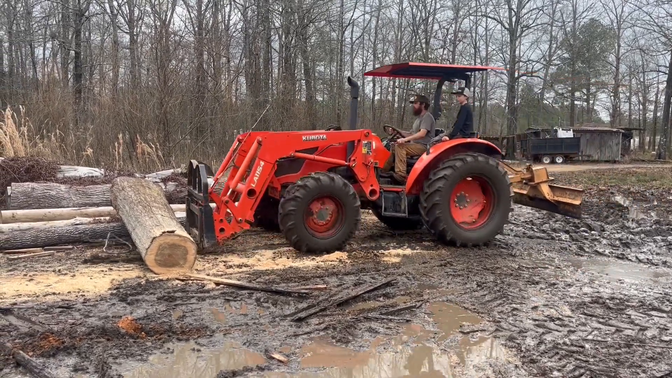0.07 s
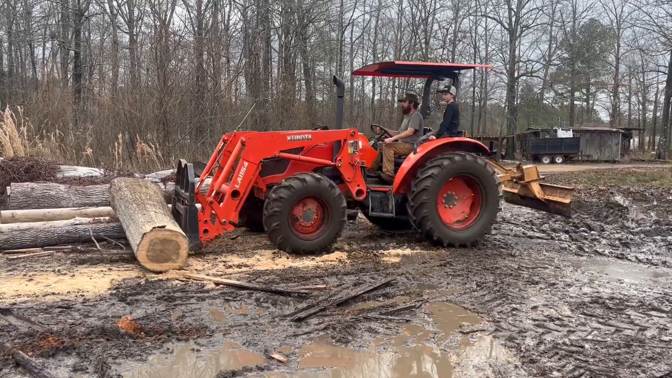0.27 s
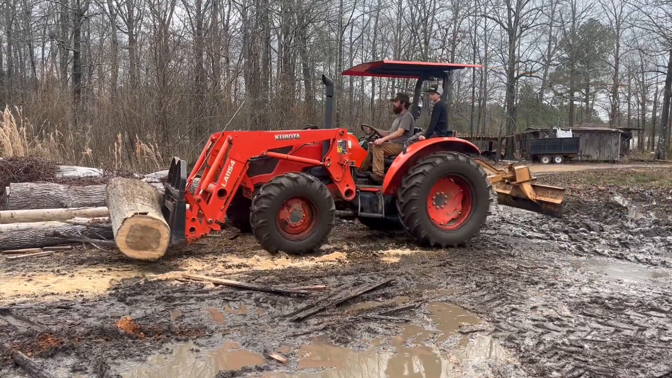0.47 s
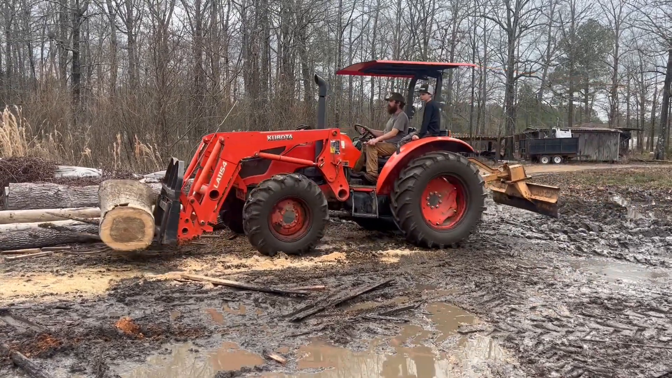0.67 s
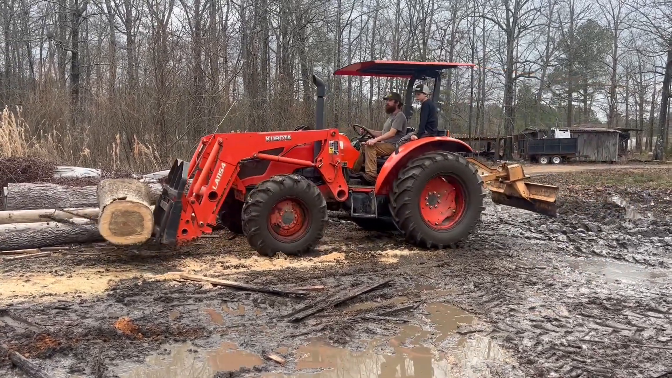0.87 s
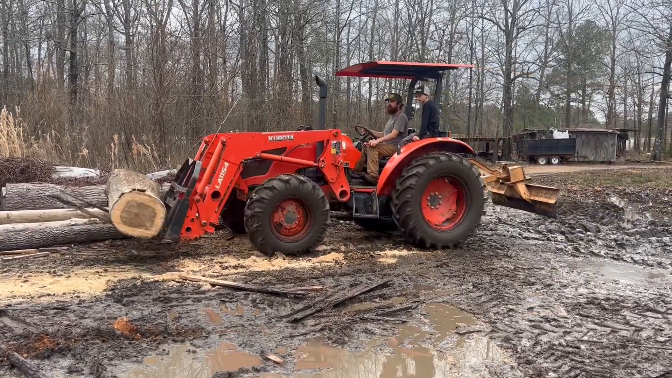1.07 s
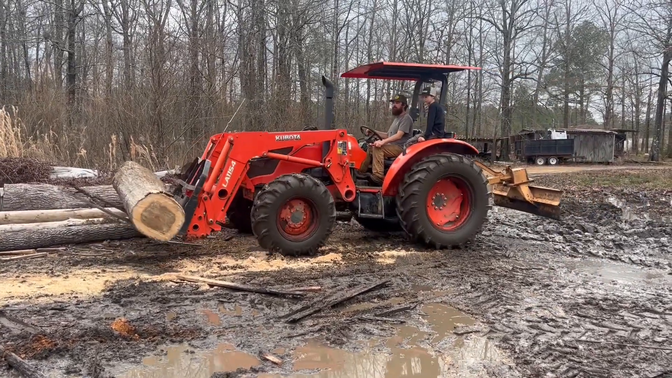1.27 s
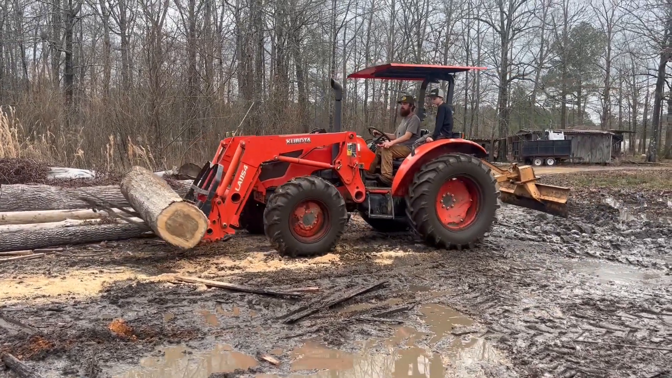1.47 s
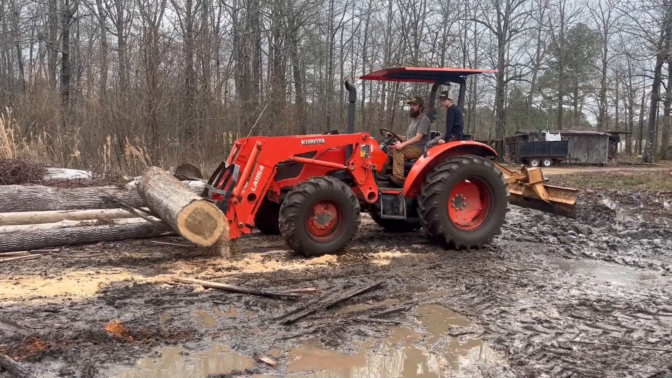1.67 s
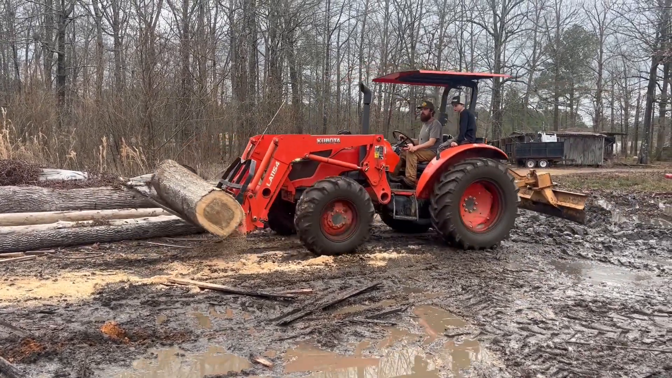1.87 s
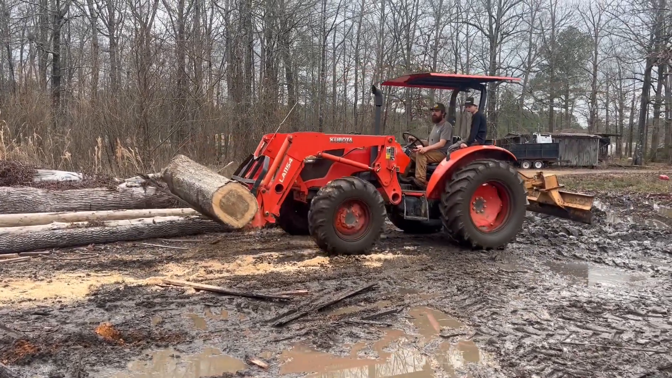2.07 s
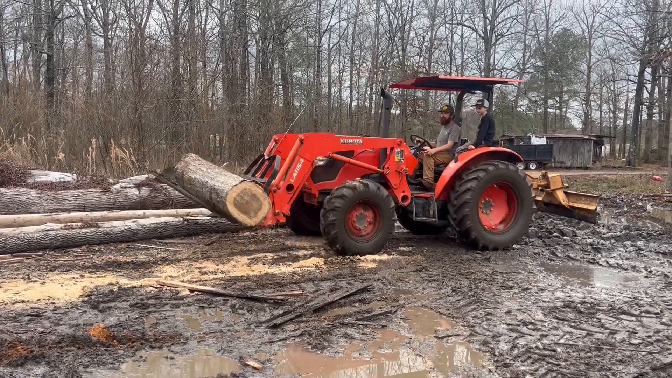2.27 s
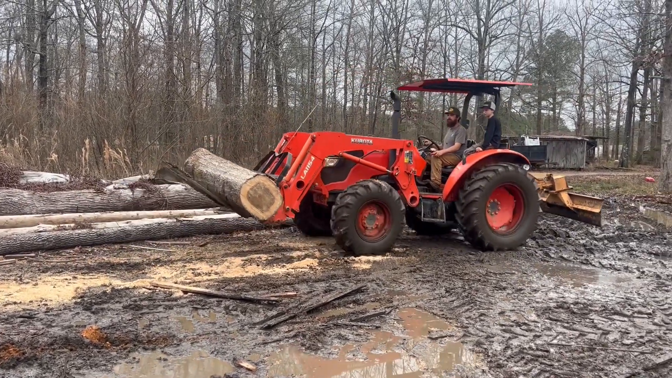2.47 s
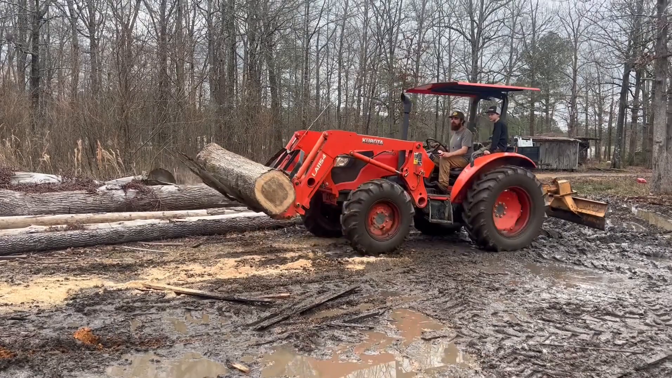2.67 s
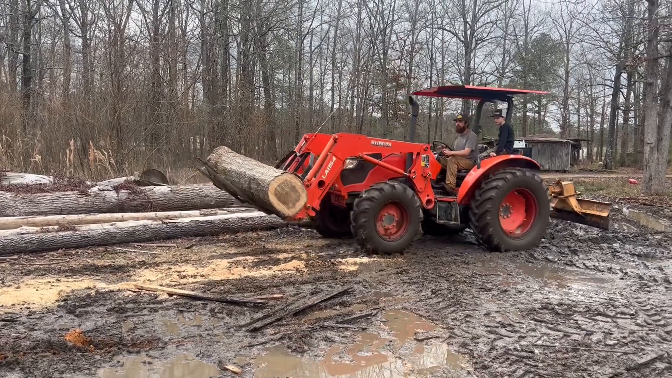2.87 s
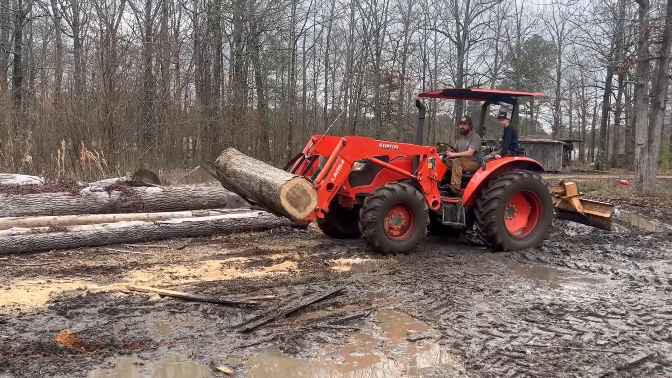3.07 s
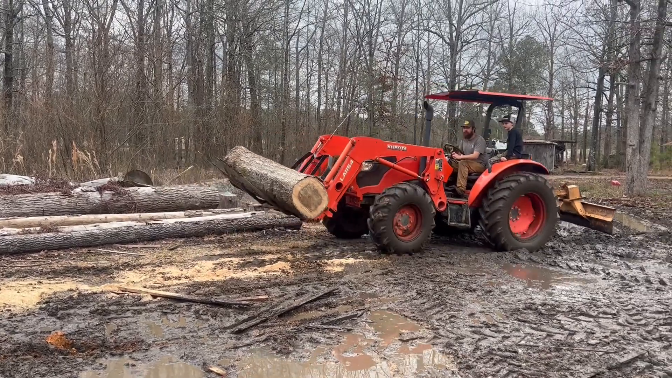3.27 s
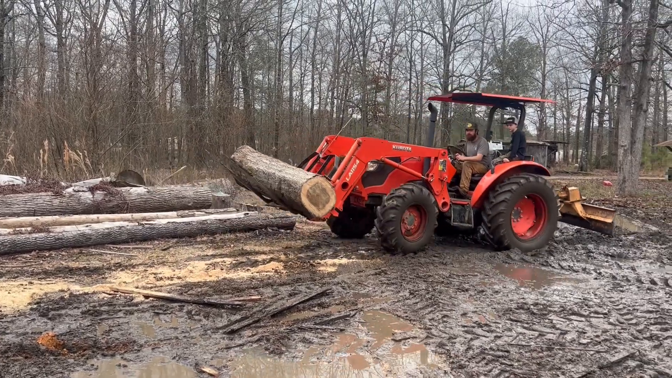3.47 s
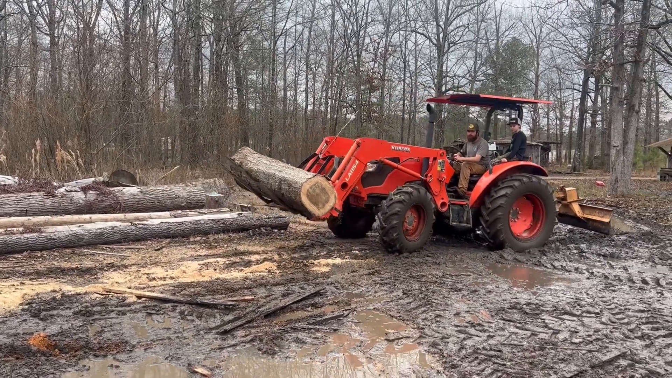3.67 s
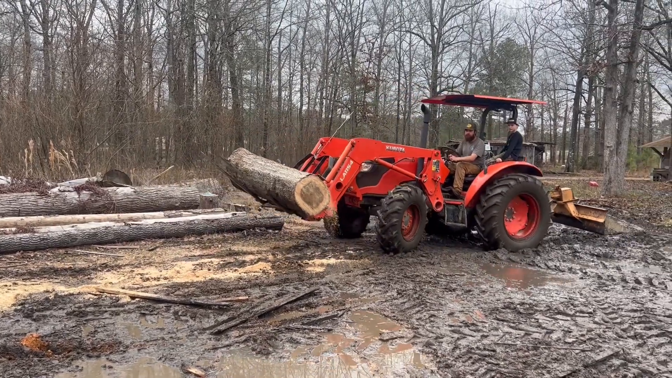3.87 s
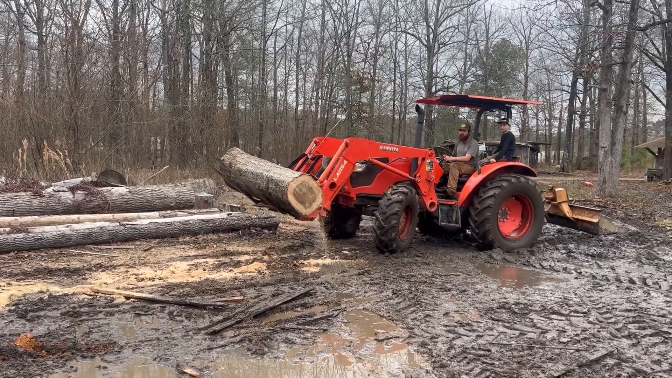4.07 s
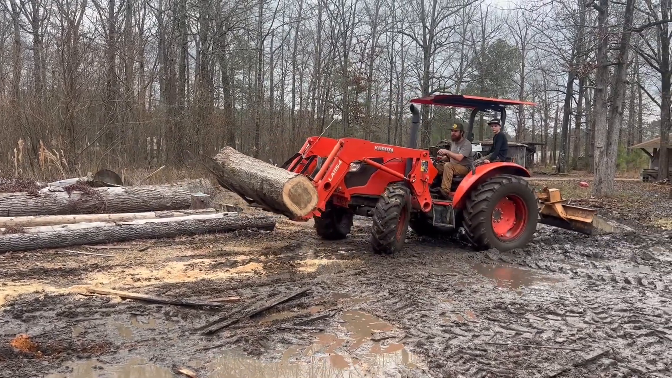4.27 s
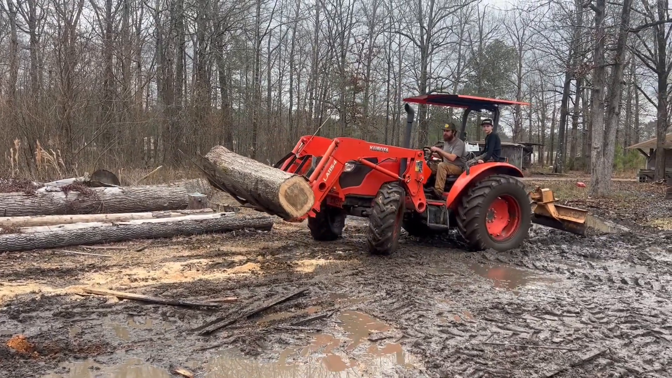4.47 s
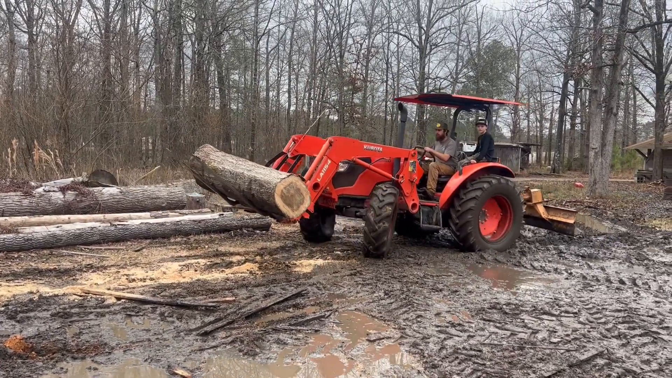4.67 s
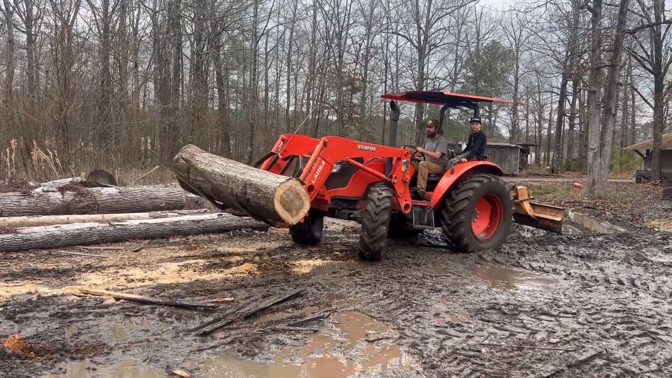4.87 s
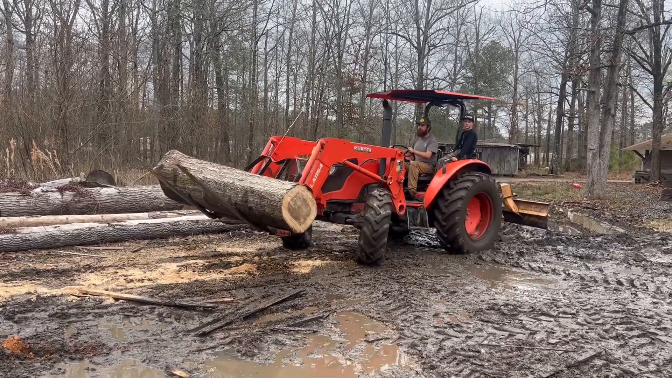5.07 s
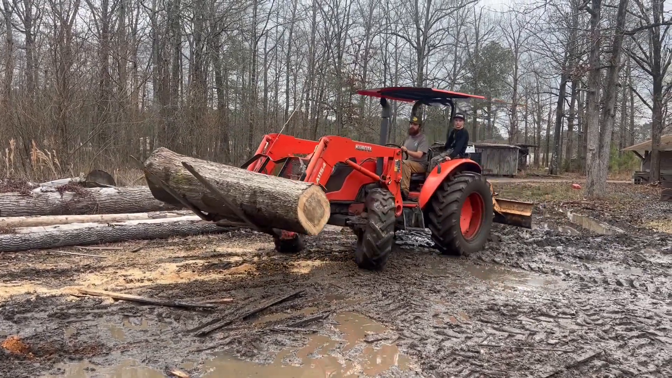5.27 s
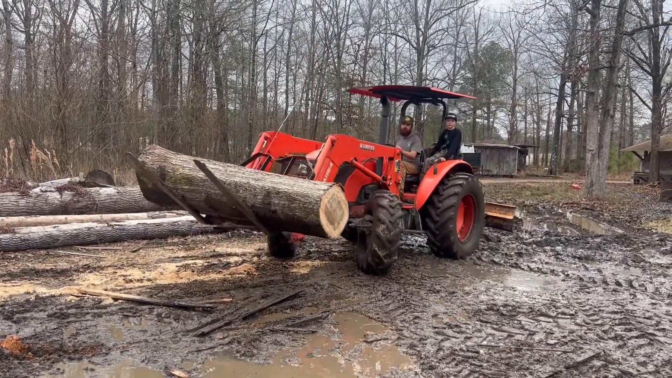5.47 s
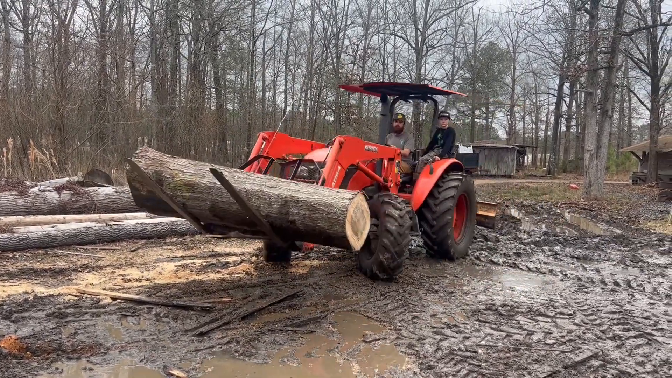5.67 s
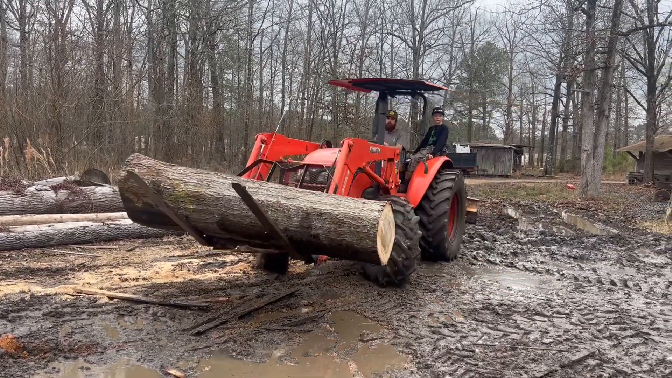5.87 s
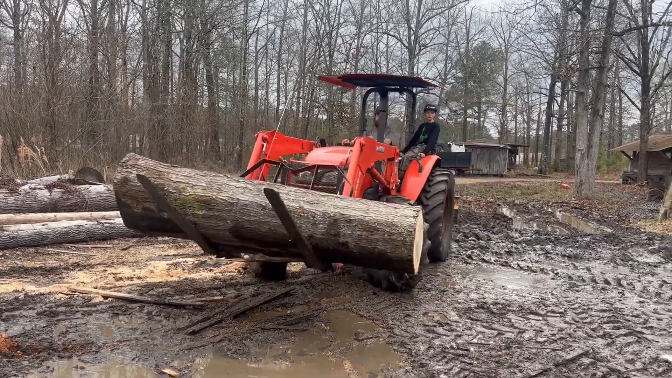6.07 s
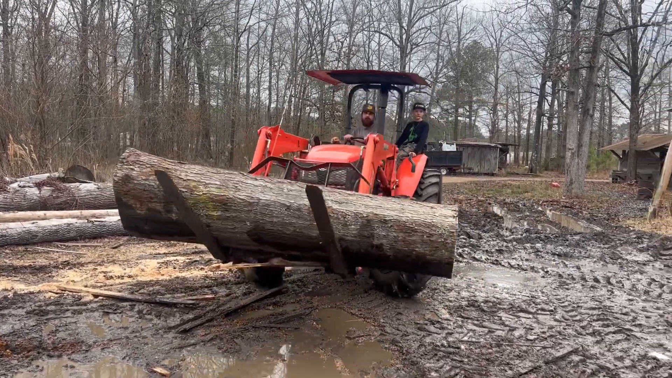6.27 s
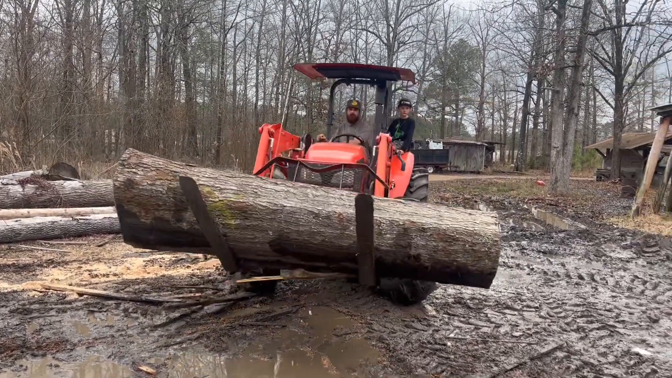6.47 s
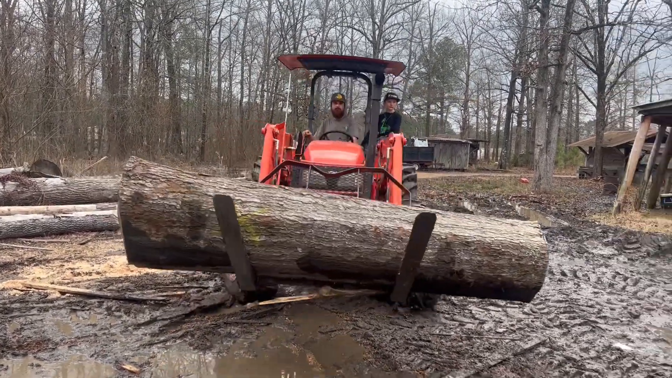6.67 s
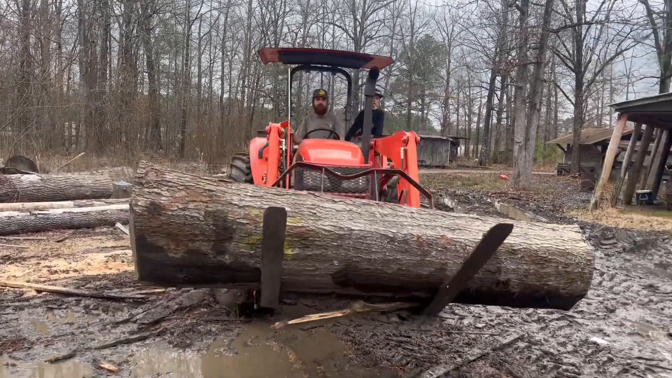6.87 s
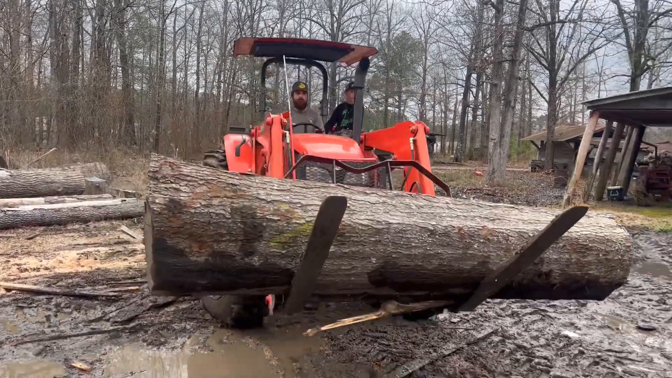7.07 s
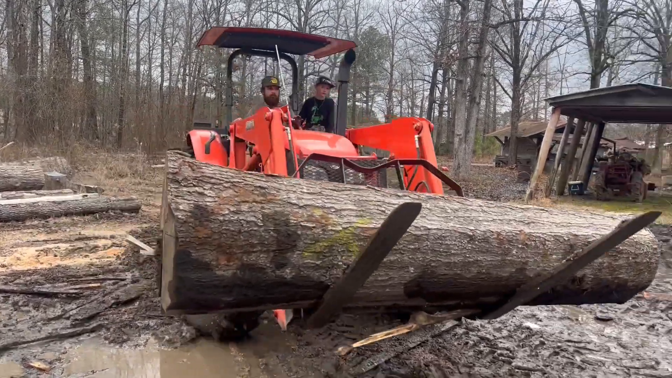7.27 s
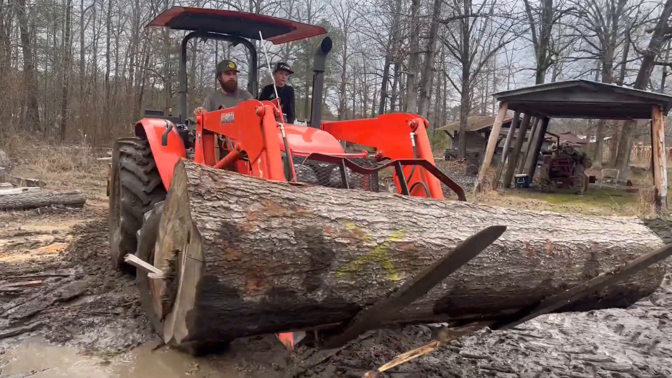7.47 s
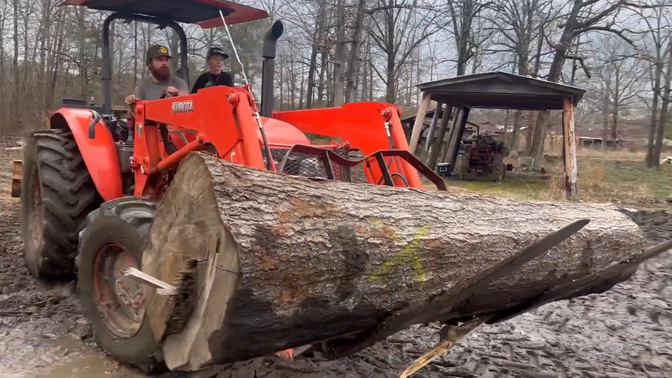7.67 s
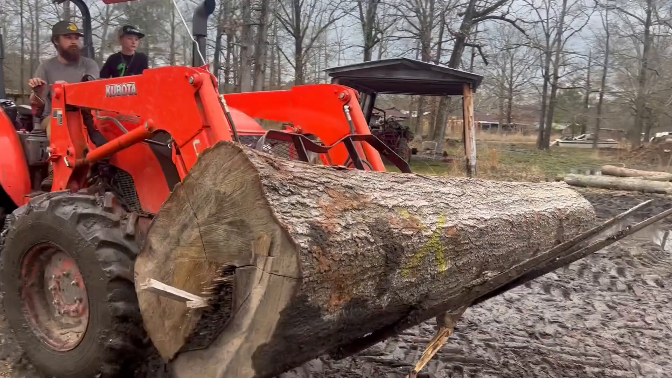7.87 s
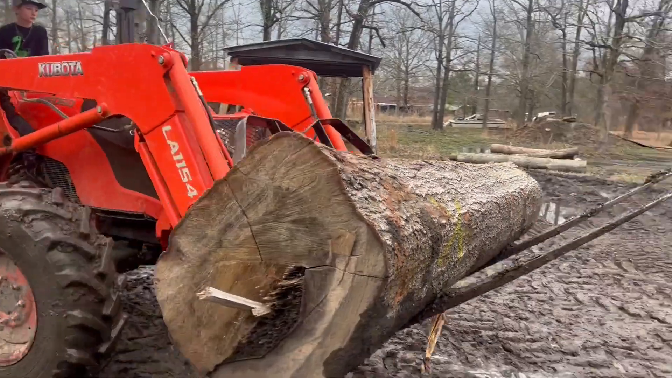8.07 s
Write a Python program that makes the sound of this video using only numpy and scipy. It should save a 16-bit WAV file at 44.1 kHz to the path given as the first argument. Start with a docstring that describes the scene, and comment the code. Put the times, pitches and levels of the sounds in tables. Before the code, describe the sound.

Open muddy yard, handheld stereo microphone. From 0 s a diesel tractor chugs low and moderately loud, with knocking clatter, hydraulic hum and soft tyre rumble. A firm clank of steel on wood lands at 0.4 s, with smaller rattles until about 0.65 s. The rumble sinks near 1 s, then a loose run of dull knocks and light rattles follows from 1.2 to 1.8 s, with faint ticks to 2.2 s. Engine pitch rises around 1.7-2 s, with brief thin hydraulic whines until 2.7 s, then holds steady. It surges near 4.2 s, dips, and short buzzy steering groans come at 4.6-4.9 s. From 5 s revs climb clearly, with wavering gear whines. From 6 s the drone is strong and high-revving; small clicks come at 6.5 and 6.9 s. From 7.4 s deep tyre thumps, heavy rumble, another groan at 7.8 s and sharp little rattles mark the close, loudest pass, still running at 8.1 s.

```python
"""A diesel tractor lifts a log on its loader forks, backs up, turns and drives close past in a muddy yard.
Its engine makes clean exhaust and pump tones from sines, and knock, drone and hiss from noise that pulses
with each firing. Tyres and driveline rumble below as filtered noise, and gears sing as gliding sines.
The log and forks clank, mostly early on, as tiny random contacts that ring the steel; the steering
hydraulics groan as an uneven buzz with a rush of oil."""
import sys
import numpy as np
from scipy import signal
from scipy.fft import rfft, irfft, next_fast_len
from scipy.io import wavfile
from scipy.ndimage import uniform_filter1d

SR = 44100
rng = np.random.default_rng(int(sys.argv[2]) if len(sys.argv) > 2 else 0)


def unload_audio(sound):
    """Save the sound as a 16-bit wav file, at the path given as the first command line argument."""
    columns = np.transpose(np.atleast_2d(sound))
    # keep every value between -1 and 1, then stretch to whole-number steps
    steps = np.round(np.clip(columns, -1, 1) * 32767)
    wavfile.write(sys.argv[1], SR, steps.astype(np.int16))


N = 358091
EDGE_S = 0.0565   # opening time of a valve, and its closing time

# colour of the knock and of the rushing oil: (frequency [Hz], level per Hz [dB])
KNOCK_SPECTRUM = [(300, -42), (540, -11), (640, 1), (740, -1.5), (1000, 0.5), (1250, 0.5), (1520, -7),
                  (1750, -3.5), (2100, -5.5), (2600, -10), (3150, -5), (4000, -12.5), (5000, -15),
                  (6000, -39)]
# colour of the hiss and of the bright crack of a blow: (frequency [Hz], level per Hz [dB])
HISS_SPECTRUM = [(3000, 3.5), (5000, 3), (6000, -2.5), (8000, 2.5), (11000, -4.5), (14000, -11),
                 (16000, 2.5)]
# stereo image: (frequency [Hz], phase by which left leads [rad], left over right [dB], likeness [0-1])
STEREO_IMAGE = [(60, .2, 1.2, .97), (300, .35, 0, .95), (650, .3, .3, .85), (1200, .2, -1.9, .9),
                (2000, -.4, -1.8, .8), (3530, 1.2, .5, .75), (5080, .9, .7, .75), (5940, -.3, 0, .9),
                (6800, 0, 0, .98), (8500, -1.3, 0, .98), (9300, -np.pi, 0, .997), (10800, -np.pi, 0, .997),
                (11500, -4.5, 0, .98), (12700, -2 * np.pi, 0, .99), (14300, -2 * np.pi, 0, .99),
                (15500, -8.3, 0, .97)]


def from_db(db):
    """Turn a level in dB into a gain."""
    return 10 ** (np.asarray(db) / 20)


def rms_one(x):
    """Scale a sound to an rms of 1."""
    return x / np.sqrt(np.mean(x ** 2) + 1e-20)


def in_time(rows):
    """Draw straight lines between the points of a time table, one curve per column."""
    s, *columns = np.transpose(rows)
    return [np.interp(np.arange(N) / SR, s, column) for column in columns]


def over_hz(rows, size):
    """Read each column of a frequency table on an FFT grid, along a log frequency scale."""
    hz, *columns = np.transpose(rows)
    grid = np.log(np.maximum(np.arange(size // 2 + 1) * SR / size, 1))
    return [np.interp(grid, np.log(hz), column) for column in columns]


def drift(rate_hz):
    """Wander slowly by chance: noise through two equal one-pole low-passes, with a spread of 1."""
    r = np.exp(-32 * np.pi * rate_hz / SR)   # one step is 16 samples
    white = rng.standard_normal(N // 16 + 3002)
    slow = signal.lfilter([1], [1, -2 * r, r * r], white)[3000:]   # leave out the filter's start
    return np.interp(np.arange(N) / 16, np.arange(len(slow)), rms_one(slow))


def coloured(spectrum, envelope):
    """Shape two unrelated noises (direct and scattered) in time, then in frequency; rms 1."""
    size = next_fast_len(N)
    white = envelope * rng.standard_normal((2, N))
    gain = from_db(over_hz(spectrum, size)[0])
    return rms_one(irfft(rfft(white, size) * gain, size)[:, :N])


def tone(turns, level_db, waver_db=1.0):
    """Make a sine whose rms level wavers by chance around level_db."""
    gain = from_db(level_db + waver_db * drift(27))
    return np.sqrt(2) * gain * np.cos(2 * np.pi * turns)


def valve(start, length):
    """Open a gain over EDGE_S, hold it for the given length in seconds, then close it over EDGE_S."""
    t = np.arange(N) / SR - start
    return np.clip(np.minimum(t, length + 2 * EDGE_S - t) / EDGE_S, 0, 1)


def pulse_gate(turns, depth_db, fall, even=False):
    """Add to a steady gain one sharp, dying burst per turn, each with its own strength."""
    # knock strength of each cylinder in turn: (level [dB])
    cylinders_db = [-2.1, -0.5, -0.3, 0.1]
    pattern_db = np.array([0] if even else cylinders_db)
    count = turns.astype(int)
    chance_db = 2 * rng.standard_normal(count[-1] + 1)
    strength_db = pattern_db[count % len(pattern_db)] + chance_db[count]
    burst = from_db(strength_db) * np.exp(-fall * (turns % 1))
    return 1 + from_db(depth_db) * uniform_filter1d(burst, size=60)   # soften the jump


def ground_echo(x):
    """Add a late copy off the wet ground, scaled to keep the power if the two are unrelated."""
    # echo: (time [s], lag [ms], strength [0-1])
    echo = [(0, 0.954, 0.1), (1.4, .97, 0.22), (1.9, 0.94, 0.24), (4.8, 1.04, 0.01), (7.3, 0.3, 0),
            (7.8, 1.07, 0), (8.12, 1.42, 0.1)]
    lag_ms, strength = in_time(echo)
    read_at = np.arange(N) - lag_ms * SR / 1000
    late = np.array([np.interp(read_at, np.arange(N), side) for side in x])
    return (x + strength * late) / np.sqrt(1 + strength ** 2)


def reshape_bands(noisy):
    """Raise or lower three frequency bands of the noises as the tractor passes."""
    # upper middle band, dulled as the log passes in front: (time [s], level [dB])
    presence_db = [(0, 1.5), (5, 1), (6.6, 1.5), (7.2, 0.5), (7.6, 0), (7.85, -4.5), (8.12, -1)]
    # lower and upper edge of that band: (frequency [Hz])
    presence_hz = [1590, 3580]
    # bright band, rising once the bonnet draws level: (time [s], level [dB])
    bright_db = [(0, -0.5), (7.2, 0), (7.62, -4), (7.9, 0.5), (8.12, 2)]
    # lower and upper edge of that band: (frequency [Hz])
    bright_hz = [3800, 6100]
    # highest hiss, from the fan: (time [s], level [dB])
    top_db = [(0, -4), (4.5, -3.5), (6, 0.5), (6.6, 2), (7.0, 3), (7.5, 2), (8.12, 2.5)]
    bands = [(presence_hz, "band", presence_db), (bright_hz, "band", bright_db), (8900, "high", top_db)]
    for edges_hz, kind, level_db in bands:
        band = signal.sosfilt(signal.butter(2, edges_hz, kind, fs=SR, output="sos"), noisy)
        noisy = noisy + (from_db(in_time(level_db)[0]) - 1) * band
    return noisy


def gears():
    """Let gear teeth sing as load and gear change: each tone glides straight from one pitch to another."""
    # gear tones: (start [s], held length [s], first pitch [Hz], last pitch [Hz], level [dB])
    songs = [(0, .25, 1078, 1070, -43), (.6, .3, 1100, 1095, -44), (1.95, .35, 1000, 1090, -44),
             (3.85, .1, 1185, 1190, -47), (4.18, .15, 1385, 1392, -43), (4.6, .1, 890, 910, -39),
             (5.3, .4, 945, 965, -40), (5.72, .22, 1258, 1218, -38), (5.98, .55, 1216, 1207, -40),
             (6.25, .15, 1004, 1004, -41), (6.62, .45, 668, 664, -43), (6.8, .5, 1045, 1048, -40),
             (7.05, .25, 2055, 2065, -43), (7.52, .22, 1197, 1186, -36), (7.58, .36, 1030, 990, -39)]
    out, jitter = 0, 1 + .006 * drift(25)   # share of the pitch
    for s, length, first_hz, last_hz, level_db in songs:
        end = s + length + 2 * EDGE_S
        glide_hz = np.interp(np.arange(N) / SR, [s, end], [first_hz, last_hz])
        turns = np.cumsum(glide_hz * jitter) / SR
        out = out + valve(s, length) * tone(turns, level_db, waver_db=2.5)
    return out


def steering():
    """Buzz a valve unevenly, rising in pitch, as the wheels are forced round and oil rushes through it."""
    # groans: (start [s], held length [s], starting pitch [Hz], level [dB])
    groans = [(4.55, .13, 387, -36), (4.76, .08, 401, -41), (7.8, .25, 388, -39)]
    # partials of the buzz: (multiple of the pitch [times], level within the groan [dB])
    partials = [(1, 0), (2, 1), (3, 2), (5, -9), (6, -7)]
    rise_hz_per_s = 30
    out, rush = 0, from_db(1.5) * coloured(KNOCK_SPECTRUM, 1)[0]
    for s, length, hz, level_db in groans:
        glide_hz = hz + rise_hz_per_s * np.clip(np.arange(N) / SR - s, 0, 1)
        turns = np.cumsum(glide_hz * (1 + 0.014 * drift(40))) / SR
        buzz = sum(tone(k * turns, db, waver_db=3.5) for k, db in partials)
        out = out + from_db(level_db) * valve(s, length) * (buzz + rush)
    return out


def clanks():
    """Rattle steel on steel and wood: dying contacts ring the fork modes, with a bright crack on top."""
    # blows: (time [s], relative bright level [dB], relative low level [dB], time to fall to 1/e [s])
    blow_rows = [(0.402, -15.5, -5.5, 0.023), (0.468, -23, -23, 0.018), (0.483, -28.5, -18.5, 0.04),
                 (0.639, -34, -30, 0.03), (1.178, -25.5, -31, 0.02), (1.197, -29.5, -21, 0.059),
                 (1.288, -27, -11, 0.023), (1.332, -29.5, -43, 0.04), (1.452, -22.5, -32.5, 0.035),
                 (1.477, -34, -24, 0.018), (1.538, -35, -38, 0.02), (1.764, -26.5, -33, 0.01),
                 (2.02, -37.5, -41, .015), (2.236, -32, -31, 0.025), (3.848, -42, -26.5, 0.006),
                 (6.527, -25, -35, .008), (6.851, -23, -31, 0.01), (7.71, -24, -40, .003),
                 (7.771, -21, -31, 0.0056), (7.884, -29.5, -20, 0.013), (7.892, -32, -33, 0.0061),
                 (8.097, -22, -28, 0.016)]
    # ringing of forks and loader frame: (frequency [Hz], relative level [dB], time to fall by 60 dB [s])
    fork_modes = [(205, 8, .1), (305, 9, 0.1), (370, 3, .08), (517, 1, 0.1), (650, 2, 0.11),
                  (820, -3, 0.08), (1087, -2, 0.09), (1250, -2, 0.09), (1390, -7, 0.06), (1670, -6, 0.07),
                  (1884, -3, 0.08), (2050, -8, .06), (2300, -10, .05), (3090, -14, 0.05), (3390, -15, 0.07),
                  (5050, -20, 0.028), (7600, -7, 0.05), (8300, -1.5, 0.034)]
    # dull body of the log: (frequency [Hz], level per Hz [dB])
    wood_spectrum = [(400, -26), (700, -6), (1100, 0), (1500, -1), (1900, -4), (2500, -18), (3200, -14),
                     (4500, -24), (6000, -40)]
    settle_s, swell_s, contacts_per_s = .008, .012, 700
    soft_contact_hz = 2400   # wood on steel is a soft contact, weak above this
    t, low, bright = np.arange(N) / SR, np.zeros(N), np.zeros(N)
    for s, bright_db, low_db, length in blow_rows:
        fade = np.exp(-np.clip(t - s, 0, None) / length) * (t >= s)
        # the low part gathers force as the load settles; the bright rattle builds up
        low += from_db(low_db) * fade * np.clip((t - s) / settle_s, .5, 1)
        bright += from_db(bright_db) * fade * np.clip((t - s) / (.3 * length), 0, 1)
    r = np.exp(-1 / (swell_s * SR))
    deep = signal.lfilter([1 - r], [1, -r], low)   # the lowest modes swell late
    out, first = np.zeros((2, N)), [int(row[0] * SR) + 1 for row in blow_rows]
    for hz, mode_db, t60 in fork_modes:
        touches = rng.random((2, N)) < contacts_per_s / SR
        contacts = touches * rng.standard_normal((2, N))
        contacts[0, first] = 3.0 * rng.choice([-1, 1], len(first))   # the first contact is firm
        if hz < 700:
            force = from_db(-19.0) * deep
        elif hz < 4000:
            force = from_db(-19.0) * low
        else:
            force = from_db(-25.0) * bright
        blows = from_db(mode_db) * force * contacts + 1e-18
        if hz < soft_contact_hz:
            blows = signal.sosfilt(signal.butter(2, soft_contact_hz, fs=SR, output="sos"), blows)
        r, w = from_db(-60 / (t60 * SR)), 2 * np.pi * hz / SR
        out += signal.lfilter([0, np.sin(w)], [1, -2 * r * np.cos(w), r * r], blows)
    crack = coloured(HISS_SPECTRUM, 1) * from_db(-2) * bright
    return out + crack + coloured(wood_spectrum, 1) * from_db(-7.0) * low


def tyres():
    """Bite each tyre lug into the mud, so that it thuds and shakes the driveline."""
    # lugs biting the ground: (time [s], rate [per s])
    tread = [(0, 20.5), (2.6, 20.2), (3.8, 18), (5.8, 15.5), (6.3, 16.5), (8.12, 16.6)]
    # colour of the rumble: (frequency [Hz], level per Hz [dB])
    rumble_spectrum = [(30, -35), (70, -16), (110, -3), (150, 3.5), (200, -5), (260, -7), (500, -58.5)]
    lugs = np.cumsum(in_time(tread)[0]) / SR + .25
    thuds = pulse_gate(lugs, depth_db=9, fall=4.5, even=True)
    loose = coloured(rumble_spectrum, from_db(drift(9.4)) * thuds)
    # each lug also gives a firm push of scattered strength, in the direct sound only
    count, size = lugs.astype(int), next_fast_len(N)
    strength_db = 4 * rng.standard_normal(count[-1] + 1)
    bites = np.diff(count, prepend=count[0]) * from_db(strength_db[count])
    gain = from_db(over_hz(rumble_spectrum, size)[0])
    pushes = rms_one(irfft(rfft(bites, size) * gain, size)[:N])
    return rms_one(loose + from_db(-2) * pushes * [[1], [0]])


def ruts():
    """Thump the tyres in the ruts: deep noise whose level wanders."""
    # thump: (time [s], level [dB])
    thump = [(0, -36), (5.6, -51), (6, -33), (6.5, -35), (7.1, -39), (7.45, -20), (7.8, -22), (8.12, -30)]
    deep_spectrum = [(20, -35), (45, 0.5), (80, 9), (120, 10.5), (300, -74.0)]   # (Hz, dB per Hz)
    return from_db(in_time(thump)[0]) * coloured(deep_spectrum, from_db(2.0 * drift(26)))


def panels(firings, shake_db):
    """Shake bonnet and covers with each firing: narrow resonances that swell and fade on their own."""
    # panel resonances: (frequency [Hz], width [Hz], level before the sum is scaled [dB])
    resonances = [(640, 70, -7), (900, 110, -4), (1045, 120, -2), (1190, 110, -1), (2050, 160, -7),
                  (2320, 130, -9), (3150, 260, -9)]
    force = pulse_gate(firings, depth_db=-13.5, fall=7.7) * rng.standard_normal((2, N))
    out = 0
    for hz, width_hz, level_db in resonances:
        r = np.exp(-np.pi * width_hz / SR)
        rings = signal.lfilter([1, 0, -1], [1, -2 * r * np.cos(2 * np.pi * hz / SR), r * r], force)
        out = out + from_db(level_db + 2 * drift(3)) * rms_one(rings)
    return from_db(shake_db) * rms_one(out)


def follow(clatter_db, middle_db, share):
    """Let a level sit at middle_db when the clatter is at -32 dB, and take a share of its swing."""
    return middle_db + share * (clatter_db + 32)


def engine_noise(firings, clatter_db, strain_db):
    """Pulse noise with each firing: bodywork drone, knock, hiss and shaken panels follow the clatter."""
    # colour of the bodywork drone: (frequency [Hz], level per Hz [dB])
    drone_spectrum = [(120, -41), (200, -3), (250, -1), (320, -2), (420, -5), (520, -20), (800, -58)]
    # the bodywork also takes a share of the driveline's swing
    drone_db = follow(clatter_db, middle_db=-30.5, share=1.17) + 0.088 * strain_db
    knock_db = follow(clatter_db, middle_db=-34, share=0.71)
    hiss_db = follow(clatter_db, middle_db=-46, share=0.45)
    shake_db = follow(clatter_db, middle_db=-39, share=2.04)
    drone = coloured(drone_spectrum, pulse_gate(firings, depth_db=-1.5, fall=3.5))
    knock = coloured(KNOCK_SPECTRUM, pulse_gate(firings, depth_db=1, fall=3))
    hiss_pulses = pulse_gate(firings, depth_db=12.0, fall=1.3) * from_db(1.0 * drift(13))
    hiss = coloured(HISS_SPECTRUM, hiss_pulses)
    out = from_db(drone_db) * drone + from_db(knock_db) * knock + from_db(hiss_db) * hiss
    return out + panels(firings, shake_db)


def pump_tones(per_s, firings):
    """Drive the geared pump's own series of tones: an oil line picks out one order, the forks add whines."""
    # hydraulic pressure, as the pump tone at the oil-line resonance: (time [s], level [dB])
    pressure = [(0, -28), (.55, -24.5), (.78, -35), (1, -25), (1.56, -26.5), (1.7, -34), (3.3, -40),
                (3.5, -33), (3.95, -32.5), (4.1, -45), (5.6, -38), (5.8, -28.5), (6.7, -26), (7.3, -19.5),
                (7.6, -27.5), (8.12, -20.5)]
    # whines as the forks lift and tilt: (start [s], held length [s], level [dB])
    fork_whines = [(0, 1.3, -50), (1.97, .04, -43), (2.08, .17, -39), (2.39, .02, -43), (2.5, .11, -43)]
    strokes_per_firing = 2.1875
    pipe_hz, pipe_width_hz = 290, 100
    strokes, pump = strokes_per_firing * firings, 0
    for k in (2, 3):
        detune = 2 * (k * strokes_per_firing * per_s - pipe_hz) / pipe_width_hz
        pump = pump + tone(k * strokes, in_time(pressure)[0]) / (1 + detune ** 2)
    pump = pump + tone(2 * strokes, -45.5)   # always there
    high = sum(from_db(db) * valve(s, length) for s, length, db in fork_whines)
    # faint 16th and 6th orders stay on between the whines
    whine = (high + from_db(-60)) * tone(16 * strokes, 0, waver_db=1.5)
    hum = (high * from_db(-7) + from_db(-59)) * tone(6 * strokes, 0, waver_db=2.0)
    return pump + whine + hum


def exhaust_tones(per_s, firings, first_db, note_db, strain_db):
    """Turn exhaust pulses into sines at multiples (orders) of the firing rate."""
    # side orders: (multiple of firing rate [times], level at middle speed [dB],
    # gain per extra firing per s [dB], share of the driveline's swing [dB per dB], waver [dB])
    side_orders = [(1.75, -55.5, 1.5, .6, 4), (2.25, -49.5, 1.0, 0.52, 3.5), (3, -35, -0.22, 0.55, 5),
                   (3.75, -43, -0.62, .9, 1.5), (4, -44, -.3, 0.46, 3.5)]
    # uneven cylinders and a higher exhaust order: (multiple of firing rate [times], level [dB])
    minor_orders = [(2.5, -42), (5, -44.5)]
    middle_per_s = 52
    exhaust = tone(firings, first_db) + tone(2 * firings, note_db)
    for k, db, slope, share, waver_db in side_orders:
        level_db = db + slope * (per_s - middle_per_s) + share * strain_db
        exhaust += tone(k * firings, level_db, waver_db)
    for k, level_db in minor_orders:
        exhaust += tone(k * firings, level_db, waver_db=0.5)
    return exhaust


def scene():
    """Add all sources: direct sound reaches both sides alike, scattered sound in opposite sense."""
    # engine speed: (time [s], firing rate [per s])
    speed = [(0, 41.3), (.48, 41.9), (.63, 40.5), (.8, 40.4), (.96, 41.7), (1.3, 41.5), (1.58, 42.3),
             (1.76, 45.6), (2.0, 47.9), (2.3, 48.1), (2.46, 47.5), (2.65, 47.7), (3.0, 49.1), (3.48, 47.3),
             (3.81, 47.3), (4.3, 52.7), (4.69, 50.3), (5.4, 61.5), (5.75, 62.6), (6.04, 63.5), (6.18, 65.4),
             (6.59, 65), (6.83, 66.7), (7.11, 66.7), (7.33, 66.1), (7.87, 66.9), (8.12, 64.8)]
    # engine: (time [s], firing-rate tone level [dB], its octave's level [dB], clatter level [dB])
    engine_levels = [(0, -40, -29, -32.5), (.6, -43, -26, -34), (1.0, -38, -27.5, -34.5),
                     (1.4, -41, -27, -31), (1.8, -36, -31, -32), (2.1, -33, -29, -33),
                     (3.05, -31, -28.5, -34.5), (3.45, -34, -31, -33.5), (3.85, -33.5, -30, -34.5),
                     (4.2, -27.5, -26.5, -32.5), (4.45, -27.5, -26.5, -32), (4.68, -32, -23, -29.5),
                     (5.0, -27, -28.5, -30.5), (5.3, -24, -24, -29.5), (6.25, -20.5, -18, -29),
                     (6.6, -21.5, -20, -27.5), (6.85, -21, -17, -27.5), (7.7, -16.5, -23.5, -27),
                     (8.12, -18, -14.5, -27)]
    # driveline rumble: (time [s], level [dB])
    driveline = [(0, -24), (.25, -30.5), (.55, -32.5), (.85, -41), (1.2, -41), (1.4, -24.5), (1.7, -27),
                 (2.3, -25.5), (3.4, -28), (3.8, -38.5), (4.6, -29.5), (5.1, -28.5), (5.6, -32.5),
                 (6, -26.5), (6.4, -32.5), (6.8, -21), (7.2, -25.5), (7.4, -18.5), (7.65, -23), (8.12, -17)]
    per_s, = in_time(speed)
    firings = np.cumsum(per_s) / SR
    first_db, note_db, clatter_db = in_time(engine_levels)
    rumble_db, = in_time(driveline)
    strain_db = rumble_db + 25   # swing of the driveline around its middle level
    noisy = from_db(rumble_db) * tyres() + ruts()
    noisy += engine_noise(firings, clatter_db, strain_db)
    noisy = reshape_bands(ground_echo(noisy)) + clanks()
    # the likeness of the two sides sets how much noise is direct and how much is scattered
    size = next_fast_len(N)
    alike = np.clip(over_hz(STEREO_IMAGE, size)[2], 0, 1)
    shares = np.sqrt([(1 + alike) / 2, (1 - alike) / 2])
    direct, scattered = irfft(rfft(noisy, size) * shares, size)[:, :N]
    direct = direct + gears() + steering() + pump_tones(per_s, firings)
    direct = direct + exhaust_tones(per_s, firings, first_db, note_db, strain_db)
    return np.array([direct + scattered, direct - scattered])


def record(dry):
    """Give each side its phase and level by frequency, round the peaks and cut the top."""
    size = next_fast_len(N + 4096)
    lead, balance_db, _ = over_hz(STEREO_IMAGE, size)
    half = from_db(balance_db / 2) * np.exp(.5j * lead)   # each side takes half the difference
    sides = irfft(rfft(dry, size) * np.array([half, 1 / half]), size)[:, :N]
    rounded = 1.3 * np.tanh(sides / 1.3)
    return signal.sosfilt(signal.cheby2(24, 80, 15850, fs=SR, output="sos"), rounded)   # 80 dB down at 15850 Hz


dry = scene()
out = record(dry)
unload_audio(out)
```